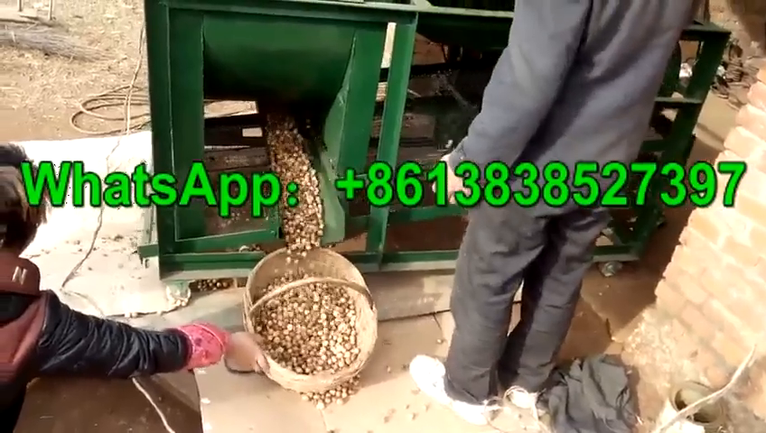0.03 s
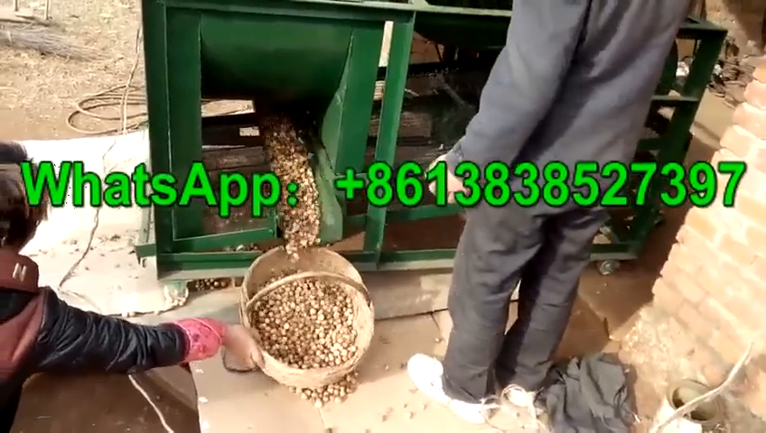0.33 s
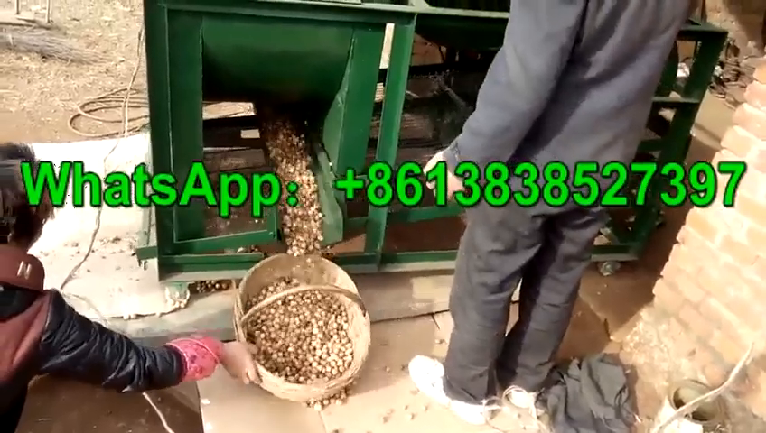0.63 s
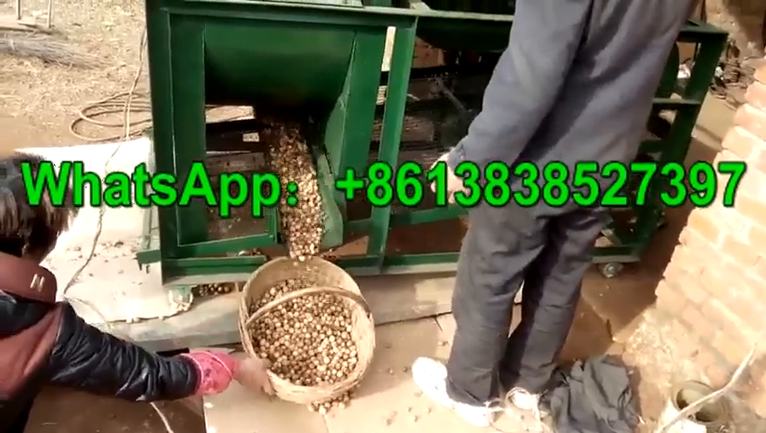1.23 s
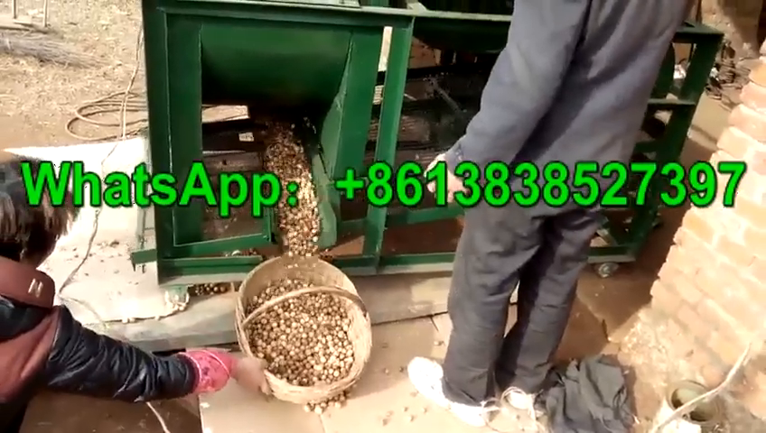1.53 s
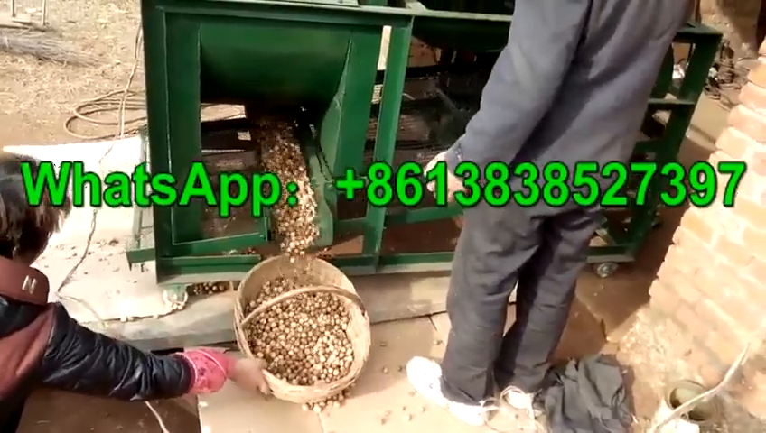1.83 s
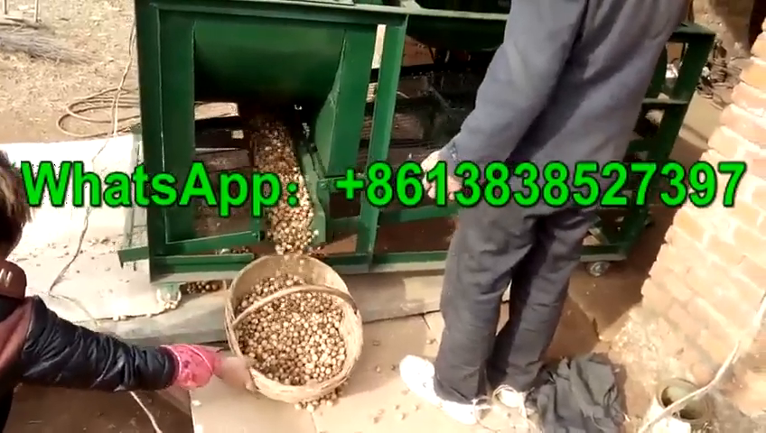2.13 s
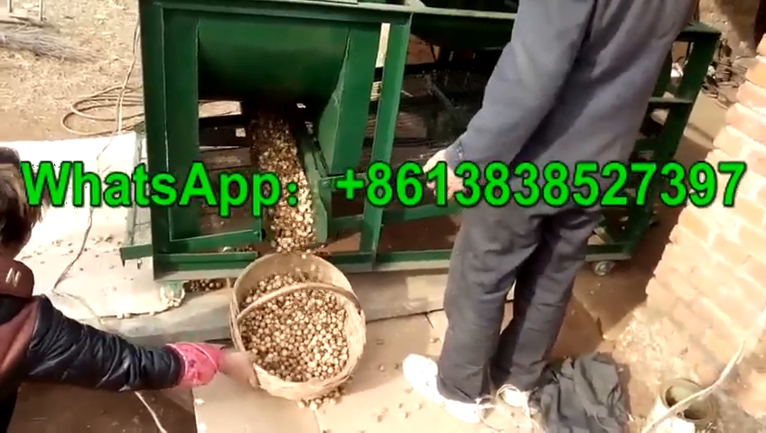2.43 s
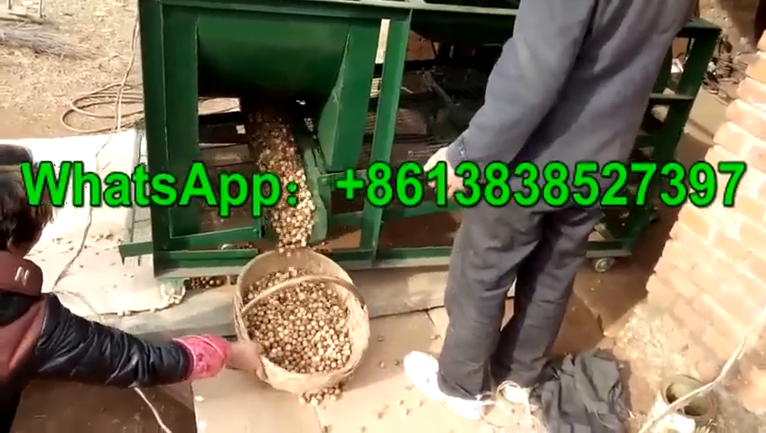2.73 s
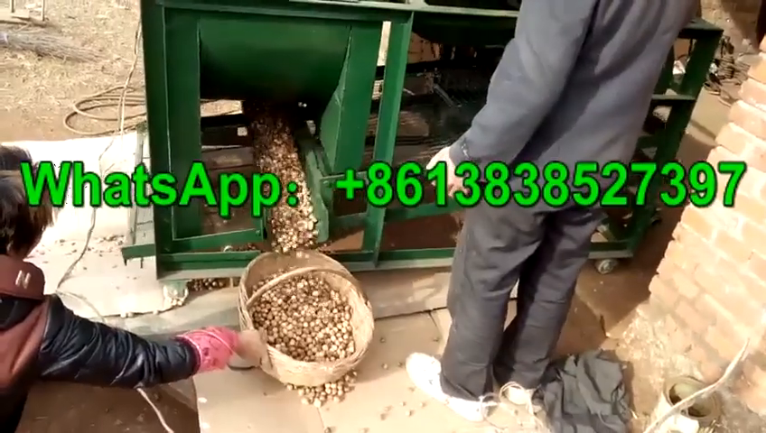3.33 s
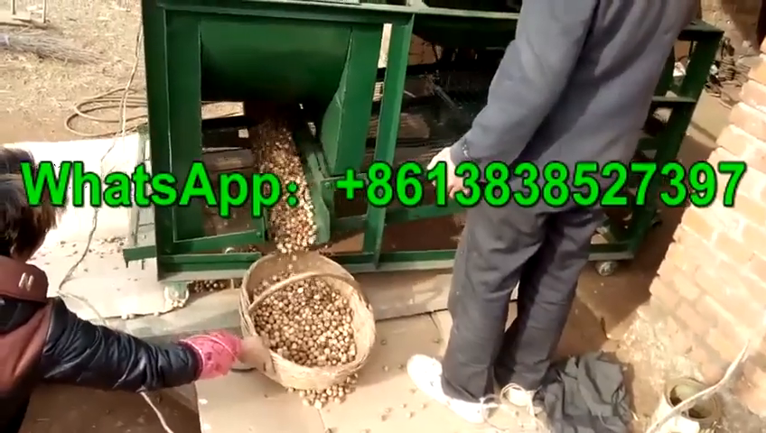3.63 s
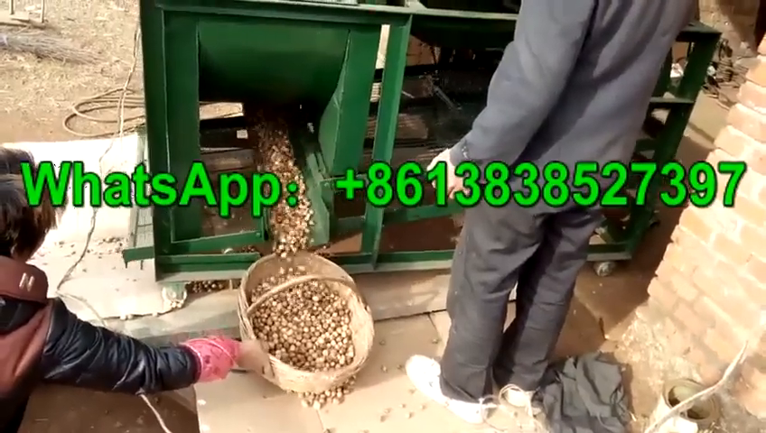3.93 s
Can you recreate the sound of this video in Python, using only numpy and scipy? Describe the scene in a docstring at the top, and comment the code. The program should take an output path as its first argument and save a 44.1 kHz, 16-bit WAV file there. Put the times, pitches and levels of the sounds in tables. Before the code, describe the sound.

A nut sheller runs close by outdoors, droning and rumbling unevenly. Nuts and shells rattle steadily over a sieve and down a metal chute into a basket, while the sieve now and then scrapes with a short squeal.

```python
"""A nut sheller runs outdoors, close by. From the start its unevenly loaded rotor drones and shakes
the steel housing, while nuts and shells rattle over a rocking sieve and down a chute into a basket.
On some strokes the sieve scrapes its frame with a short squeal, more sharply after the first second.
Around three seconds a few nuts knock hard against the drum, and just before the end the drone
swells under two last scrapes."""
import sys
import numpy as np
from scipy import signal
from scipy.fft import rfft, irfft
from scipy.io import wavfile
from scipy.ndimage import uniform_filter1d

SR = 44100
rng = np.random.default_rng(int(sys.argv[2]) if len(sys.argv) > 2 else 0)


def persist_wave(psi):
    """Save psi, clipped to +-1, as 16-bit WAV."""
    counts = np.round(np.clip(psi, -1, 1) * 32767).astype(np.int16)
    wavfile.write(sys.argv[1], SR, np.atleast_2d(counts).T)


N = 176400
T, HZ = np.arange(N) / SR, np.fft.rfftfreq(N, 1 / SR)
WASH_SHARE, FRICTION_ROUGH = .37, .35  # hiss under the clicks; depth of the stick-slip flutter

# Rotor load, driving both drone and rumble: t/s, relative level/dB
LOAD = [(0, -25), (.16, -24), (.3, -27.5), (.45, -21), (.53, -24.5), (.64, -25.5), (.71, -22), (.86, -24.5),
        (1.06, -20.5), (1.16, -26), (1.37, -22), (1.5, -24), (1.69, -25.5), (1.85, -22.5), (1.97, -23.5),
        (2.14, -24), (2.44, -21.5), (2.48, -19.5), (2.53, -22), (2.99, -22), (3.06, -25), (3.32, -21.5),
        (3.45, -25.5), (3.75, -22), (3.86, -17), (3.94, -18), (4, -28)]


def amp(db):
    """Decibels to gain."""
    return 10 ** (np.asarray(db) / 20)


def unit(x):
    """Scales to rms 1."""
    return x / np.sqrt(np.mean(x ** 2) + 1e-20)


def curve(points):
    """A control curve at every sample."""
    return np.interp(T, *np.transpose(points))


def spectrum(points):
    """A table over log frequency at every bin."""
    f, value = np.transpose(points)
    return np.interp(np.log(HZ + 1), np.log(f + 1), value)


def colour(x, points):
    """Filters by an EQ curve in dB; rms 1."""
    return unit(irfft(rfft(x) * amp(spectrum(points)), N))


def drift(hz):
    """Slow random motion up to a rate; rms 1."""
    return unit(irfft(rfft(rng.standard_normal(N)) * (HZ > 0) / (1 + (HZ / hz) ** 4), N))


def noise():
    """Two unrelated white noises."""
    return rng.standard_normal((2, N))


def stereo(x):
    """Spreads two unrelated signals over left and right, keeping the level of their middle."""
    # Stereo width: f/Hz, left-right correlation
    likeness = [(100, .998), (280, .97), (530, .87), (760, .76), (1600, .85), (2400, .85), (3400, .73),
                (4300, .35), (5100, .02), (5900, -.42), (7000, -.63)]
    # Balance: f/Hz, left minus right/dB
    balance = [(100, 4), (480, 0.5), (760, -4.5), (1100, -2.5), (1600, -2.5), (2300, -0.5), (3300, -3.5),
               (4600, -8), (6800, -3.5)]
    right, other = rfft(x)
    same, lean = np.clip(spectrum(likeness), -1, 1), amp(spectrum(balance))
    left = lean * (same * right + np.sqrt(1 - same ** 2) * other)
    middle = np.sqrt(1 + lean ** 2 + 2 * lean * same) / 2
    return irfft(np.array([left, right]) / middle, N)


def impacts(per_s, spread_db, click_s, kinds=24, echo_t60_s=.15, echo_db=-2):
    """Many short clicks of random size and shape, with reflections from the housing; even in colour."""
    t = np.arange(round(echo_t60_s * SR)) / SR
    hits = (rng.random(N) < per_s / SR) * amp(spread_db * np.minimum(rng.exponential(1, N), 5))
    kind = rng.integers(0, kinds, N)
    shapes = rng.standard_normal((kinds, 2, 512)) * np.exp(-t[:512] / click_s)
    clicks = sum(signal.oaconvolve((hits * (kind == k))[None], shapes[k], axes=1)[:, :N]
                 for k in range(kinds))
    tail = rng.standard_normal((2, len(t))) * amp(-60 * t / echo_t60_s)
    wet = rfft(clicks) * (1 + amp(echo_db) * rfft(tail / np.linalg.norm(tail[0]), N))
    smooth_power = uniform_filter1d(abs(wet) ** 2, size=300, axis=1)
    return unit(irfft(wet / np.sqrt(smooth_power), N))


def drive_whine(hz=1465, waver=.0015):
    """A faint, slightly wavering tone of the drive."""
    turns = np.cumsum(hz * (1 + waver * drift(21))) / SR
    return amp(-50) * unit(np.sin(2 * np.pi * turns) * amp(3 * drift(5)))


def rotor_turns(start_turn=.737):
    """Turns of the rotor so far."""
    # Rotor speed: t/s, rotation rate/Hz
    speed = [(0, 36.556), (.7, 36.706), (1.4, 36.78), (2, 36.809), (2.7, 36.853), (3.3, 37.049),
             (4, 36.948)]
    return start_turn + np.cumsum(curve(speed)) / SR


def housing_rumble(chug_at_turn=.25, decay_turns=.3, lag_s=.028, lag_hz=130):
    """The housing rumbles with the load and chugs once a turn, as the two heavy beaters pass."""
    # Housing EQ: f/Hz, gain/dB
    rumble_eq = [(20, -23), (36, -17.5), (46, -17.5), (66, -0.5), (95, -0.5), (125, -0.5), (190, -0.5),
                 (270, -2), (420, -7.5), (600, -12), (1000, -47.5)]
    since_beaters = (rotor_turns() - chug_at_turn) % 1
    chug = unit(1 + 1.2 * np.exp(-since_beaters / decay_turns))
    # The housing answers later the lower the pitch.
    bass_lag = np.exp(2j * np.pi * lag_s * lag_hz * (np.exp(-HZ / lag_hz) - 1))
    shaking = irfft(rfft(chug * noise()) * bass_lag, N)
    return amp(curve(LOAD) - 7) * colour(shaking, rumble_eq)


def drum_tumble(knock_s=.0081):
    """Nuts tumble inside the drum; a few knock hard against it."""
    # Tumbling envelope: t/s, relative level/dB
    tumble_level = [(0, -36.5), (.18, -35), (.37, -40), (.43, -30.5), (.52, -35.5), (1.36, -34.5),
                    (1.54, -39), (1.82, -34.5), (2.37, -35.5), (2.48, -33.5), (2.55, -34), (3.15, -36.5),
                    (3.24, -40.5), (3.31, -34), (3.46, -38.5), (3.79, -34.5), (3.87, -28.5), (4, -39.5)]
    # Drum EQ: f/Hz, gain/dB
    tumble_eq = [(200, -20), (480, -6.5), (700, -3), (950, -1), (1350, -1), (1700, -2), (2050, 0.5),
                 (2800, 2.5), (4500, -14.5)]
    # Hard knocks: t/s, level/dB
    knocks = [(2.978, -28), (2.989, -27.5), (3.193, -25)]
    nuts = impacts(per_s=1800, spread_db=.5, click_s=.0016)
    accents = sum(amp(db) * (T > s) * np.exp(-abs(T - s) / knock_s) for s, db in knocks)
    return (amp(curve(tumble_level) + 5) + accents) * colour(nuts, tumble_eq)


def rotor_drone(wobble_turns=.004):
    """Unequal beaters thump in a set pattern on every turn; the housing sets the level of each order."""
    # Drone harmonics: multiple of the rotor speed, relative level/dB
    orders = [(1, -23), (2, 1.5), (3, 1.5), (4, -4), (5, 0), (6, -4), (7, -6.5), (8, -17), (9, -11),
              (10, -26.5), (11, -16), (12, -12.5)]
    # Beater weights at equal steps around the rotor
    beaters = [.7, 0, 1, 1, 0]
    turns = rotor_turns() + wobble_turns * drift(13)
    places, drone = np.arange(len(beaters)) / len(beaters), 0
    for order, db in orders:
        phase = np.angle(np.sum(beaters * np.exp(-2j * np.pi * order * places)))
        gain = amp(db) * (1 + .12 * drift(7.2))
        drone = drone + gain * np.cos(2 * np.pi * order * turns + phase)
    return amp(curve(LOAD) - 1) * unit(drone * (1 + .038 * drift(40)))


def flow_db(stroke_hz=3.5, lull_at_s=1.21, lull_s=.02, lull_db=1.4, surge_s=.028):
    """The flow of nuts lulls before each reversal of the sieve and surges when a batch spills."""
    # Batches spilling off the sieve: t/s, boost/dB
    spills = [(.8, 3), (.895, 2.3), (1.17, 2.3), (1.44, 1.5), (2.07, 4), (2.6, 2.5), (2.915, 3), (3.2, 2.5)]
    from_lull_s = np.sin(np.pi * stroke_hz * (T - lull_at_s)) / (np.pi * stroke_hz)
    surges = sum(db * np.exp(-((T - s) / surge_s) ** 2) for s, db in spills)
    return surges - lull_db * np.exp(-(from_lull_s / lull_s) ** 2)


def chute_patter(clump_db=.76):
    """Nuts slide and patter down the steel chute into the basket."""
    # Patter envelope: t/s, base level/dB
    chute_level = [(0, -22.5), (.4, -25), (.8, -24.5), (1.04, -26.5), (1.18, -23), (1.42, -25.5),
                   (1.62, -25.5), (2.08, -25.5), (2.52, -25), (2.92, -24.5), (3.3, -26), (3.46, -22),
                   (3.54, -24.5), (4, -26)]
    # Chute EQ: f/Hz, gain/dB
    chute_eq = [(1500, -19.5), (2800, -22), (3500, -6.5), (4200, -3), (4750, -2.5), (5400, -5.5),
                (6200, -8.5), (7300, -12.5)]
    clicks = impacts(per_s=3000, spread_db=-.5, click_s=.001) + WASH_SHARE * noise()
    return amp(curve(chute_level) + flow_db() + clump_db * drift(27)) * colour(clicks, chute_eq)


def frame_ring(x):
    """Rings the modes of the steel frame; rms 1."""
    # Frame modes: f/Hz, width/Hz, relative level/dB
    steel_modes = [(1591, 28, -16), (1942, 31, -10), (2495, 120, -1.5), (2840, 97, -4), (3290, 87, -10),
                   (4627, 13, -4.5), (4900, 54, -3), (5500, 270, -3.5)]
    response = sum(amp(db) / np.sqrt(width) / (1 + 1j * (HZ - hz) / width) ** 2
                   for hz, width, db in steel_modes)
    return unit(irfft(rfft(x) * response, N))


def sieve_rattle(clump_db=.62):
    """Shells rattle in clumps, pulse with the strokes and keep the frame ringing."""
    # Rattle envelope: t/s, base level/dB
    rattle_level = [(0, -25.5), (.37, -27.5), (.7, -23.5), (1.03, -25.5), (1.35, -24.5), (1.65, -26.5),
                    (1.93, -25.5), (2.33, -27), (2.75, -25.5), (3.39, -25.5), (3.45, -30), (3.51, -24),
                    (4, -28)]
    # Sieve EQ: f/Hz, gain/dB
    rattle_eq = [(600, -34), (1600, -12), (2050, -3.5), (2400, -6), (2800, -3), (3400, -1), (4000, -3),
                 (4700, -7.5), (7300, -24.5)]
    clicks = impacts(per_s=2600, spread_db=1.5, click_s=.001) + WASH_SHARE * noise()
    level = amp(curve(rattle_level) + flow_db() + clump_db * drift(24))
    return level * (colour(clicks, rattle_eq) + amp(-19) * frame_ring(clicks))


def squeal(hz, jitter_hz):
    """One mode of the frame, kept going by stick and slip."""
    turns = np.cumsum(hz + jitter_hz * drift(130)) / SR
    return unit(np.sin(2 * np.pi * turns) * (1 + FRICTION_ROUGH * drift(140)))


def sieve_scrapes(rise=.013, ring_share=.3, ring_s=.018):
    """Each scrape swells and rings out: rising squeals over juddering friction that rings the frame."""
    # Scrapes: centre t/s, half length/s, then relative level/dB of rasp, bright rasp and each squeal
    scrapes = np.array([(.135, .02, -29.5, -38, -43, -39, -44), (.45, .02, -31, -38, -44, -38, -44),
                        (.985, .016, -33, -42, -48, -29.5, -42),
                        (1.262, .016, -24.5, -22.5, -42, -26.5, -27.5),
                        (1.545, .012, -26.5, -22, -48, -24.5, -40),
                        (1.834, .009, -25, -35, -38, -20.5, -26), (2.135, .02, -29.5, -40, -46, -36, -42),
                        (2.4, .008, -30, -21.5, -42, -21, -40), (2.421, .004, -33, -37, -35, -18, -38),
                        (2.428, .014, -39, -34, -32.5, -46, -42), (2.686, .017, -27.5, -21, -46, -24, -23),
                        (3.27, .02, -29, -40, -44, -38, -44), (3.829, .006, -23, -32, -42, -26, -27),
                        (3.851, .016, -28, -26, -42, -35, -36)])
    # Rasp EQ: f/Hz, gain/dB
    rasp_eq = [(500, -25), (1400, -15), (2050, -2), (2300, -4), (2600, 0), (3300, -5), (4200, -16),
               (7000, -28)]
    # Bright rasp EQ: f/Hz, gain/dB
    bright_eq = [(2000, -30), (3700, -14), (4550, -1), (5200, -1), (5850, -12), (7300, -22)]
    # Squeal tones: f/Hz, jitter/Hz
    squeal_tones = [(1605, 10), (2550, 32), (3288, 13)]
    # One tone riding on each rasp: f/Hz, jitter/Hz, relative level/dB
    rasp_tones = [(2070, 25, -10), (4590, 30, -10)]
    rasp = colour(noise(), rasp_eq) + amp(-11.5) * frame_ring(noise())
    bright = colour(noise(), bright_eq)
    since_s, half_s = T - scrapes[:, :1], scrapes[:, 1:2]
    pressure = 1 / np.sqrt(1 + np.square(since_s / half_s) ** 3)
    ring_out = ring_share * (since_s > 0) * np.exp(-abs(since_s) / ring_s)
    rasp_gain, bright_gain, *tone_gains = amp(scrapes[:, 2:]).T @ np.maximum(pressure, ring_out)
    bend = 1 + rise * (pressure * np.tanh(since_s / half_s)).sum(0)
    squeals = sum(gain * squeal(hz * bend, jitter)
                  for gain, (hz, jitter) in zip(tone_gains, squeal_tones))
    for gain, (hz, jitter, db) in zip((rasp_gain, bright_gain), rasp_tones):
        squeals += gain * amp(db) * squeal(hz, jitter)
    judder = unit(1 + FRICTION_ROUGH * drift(140))
    friction = amp(-1) * judder * (rasp_gain * rasp + bright_gain * bright)
    return stereo(friction) + squeals


def scene():
    """The whole machine: tones in the centre, friction, rumble and nuts spread around them."""
    return (rotor_drone() + drive_whine() + sieve_scrapes()
            + stereo(housing_rumble() + drum_tumble() + sieve_rattle() + chute_patter()))


def record(dry):
    """A steep low-pass takes off the top end."""
    taps = signal.firwin(1023, cutoff=7300, window=("kaiser", 9), fs=SR)
    return signal.oaconvolve(dry, taps[None], "same")


dry = scene()
out = record(dry)
persist_wave(out)
```